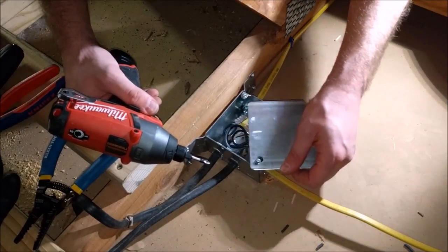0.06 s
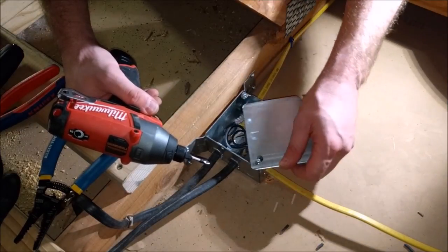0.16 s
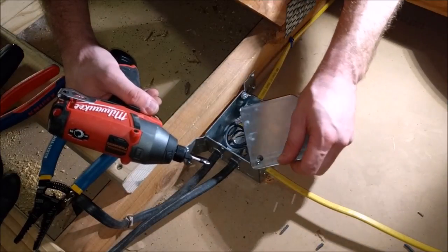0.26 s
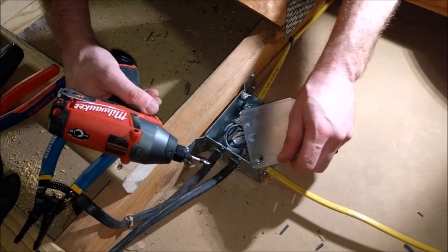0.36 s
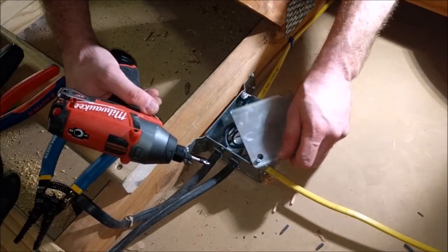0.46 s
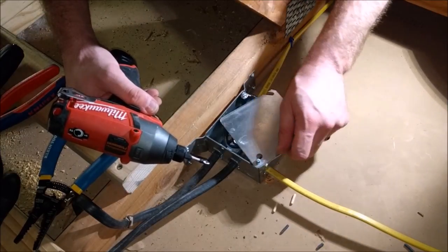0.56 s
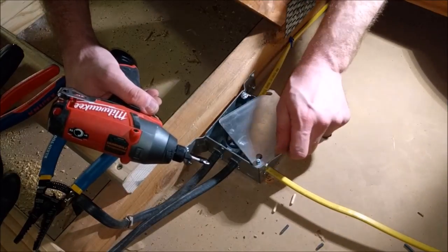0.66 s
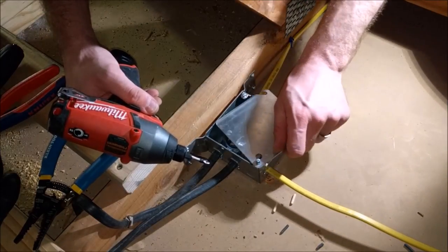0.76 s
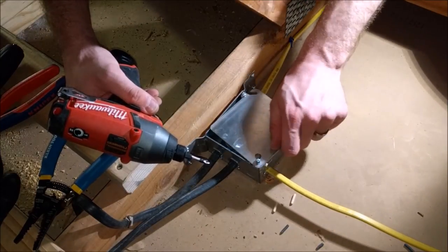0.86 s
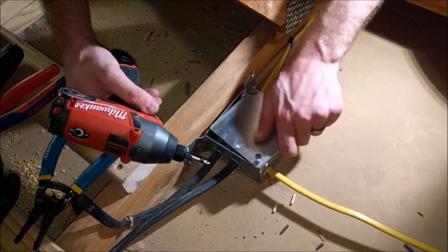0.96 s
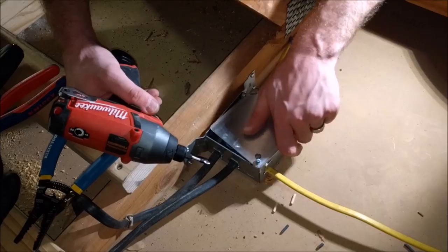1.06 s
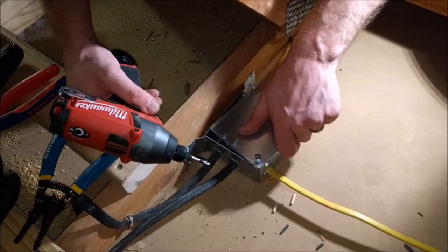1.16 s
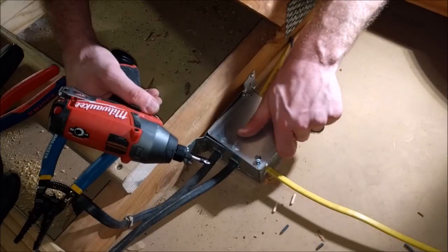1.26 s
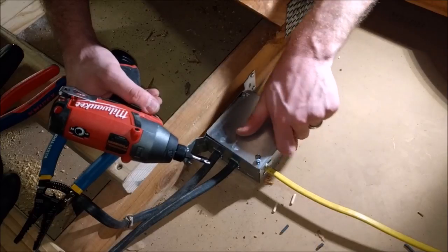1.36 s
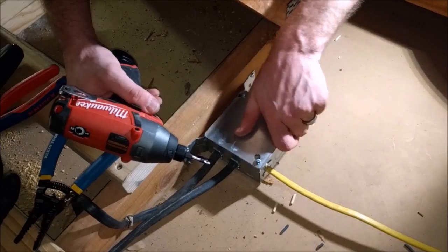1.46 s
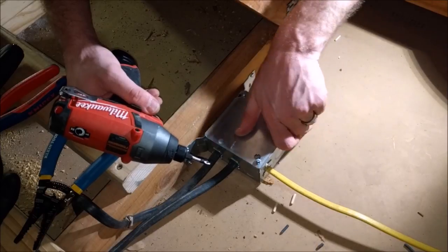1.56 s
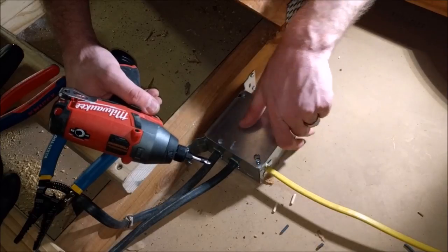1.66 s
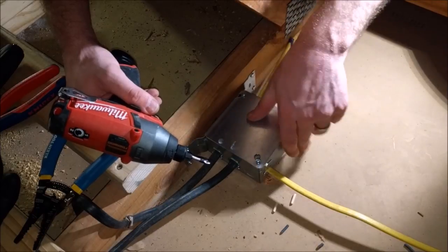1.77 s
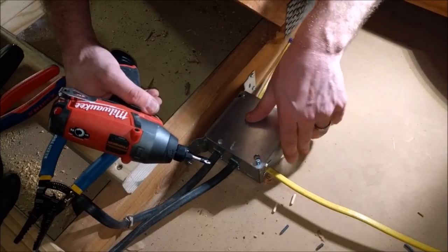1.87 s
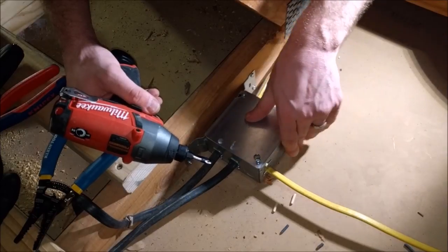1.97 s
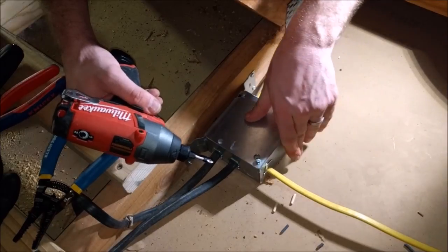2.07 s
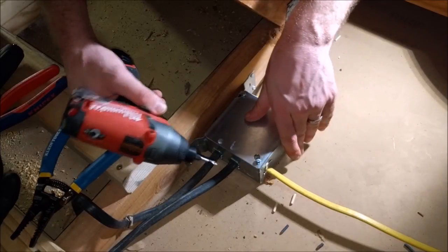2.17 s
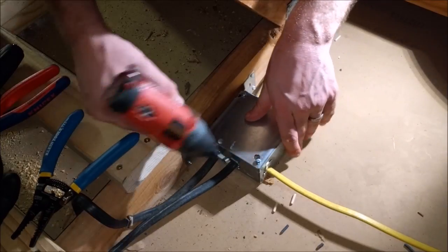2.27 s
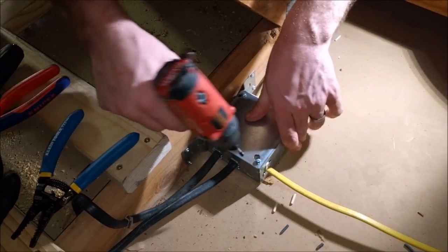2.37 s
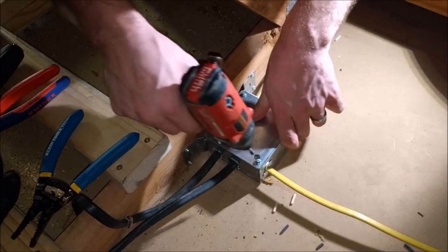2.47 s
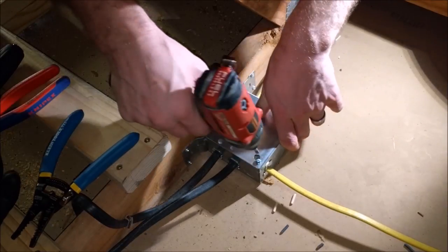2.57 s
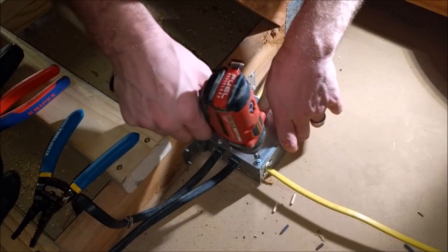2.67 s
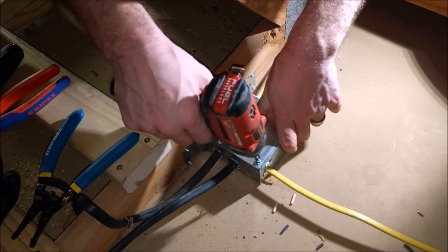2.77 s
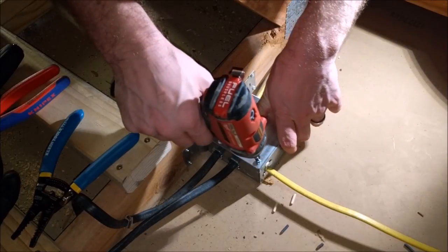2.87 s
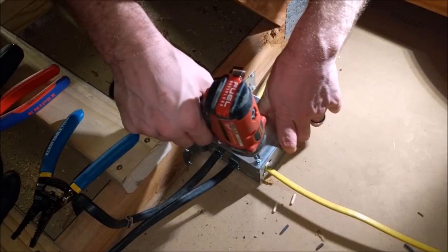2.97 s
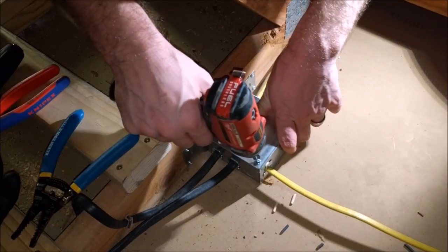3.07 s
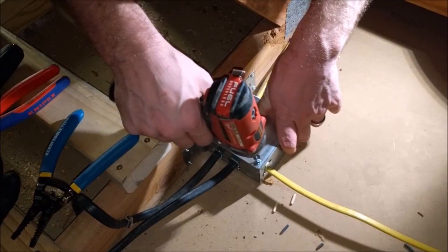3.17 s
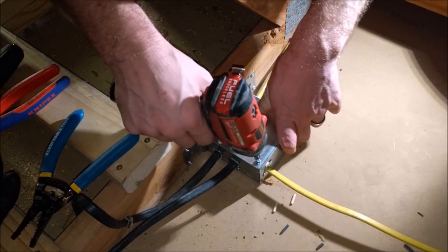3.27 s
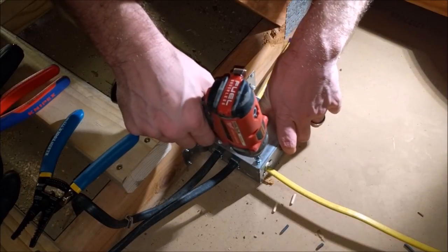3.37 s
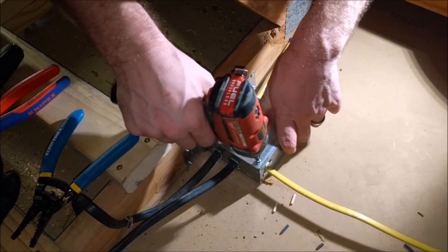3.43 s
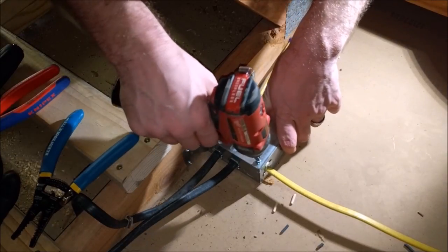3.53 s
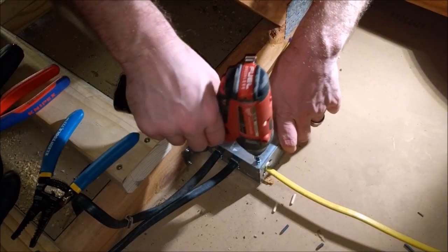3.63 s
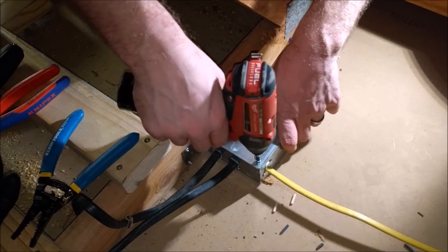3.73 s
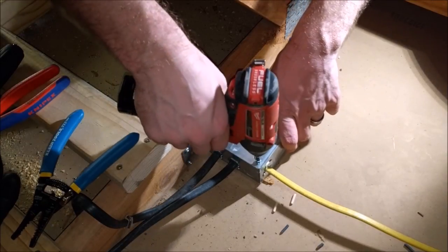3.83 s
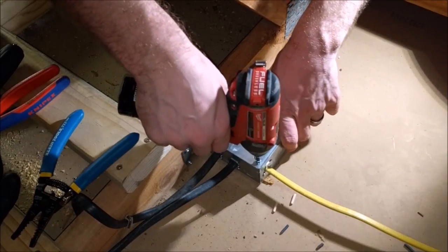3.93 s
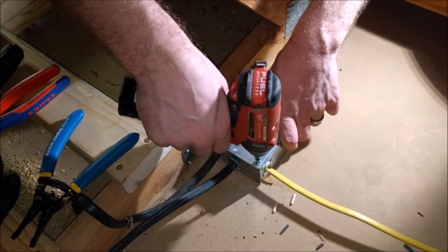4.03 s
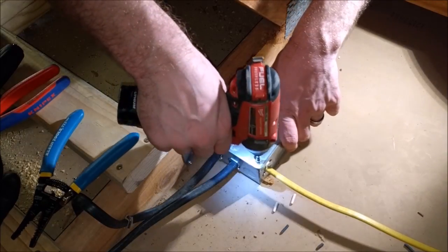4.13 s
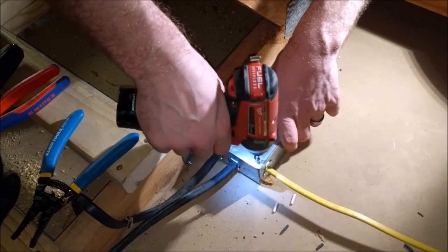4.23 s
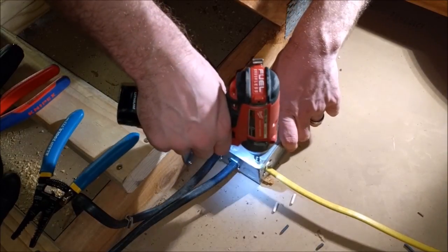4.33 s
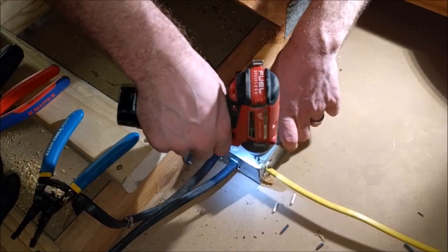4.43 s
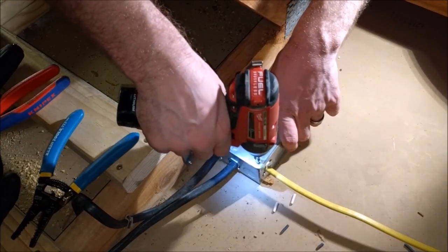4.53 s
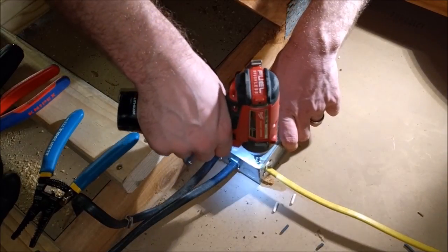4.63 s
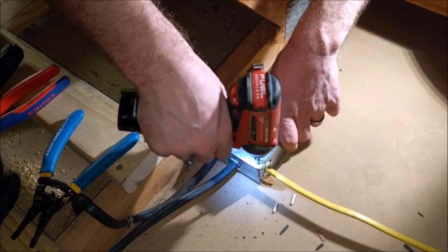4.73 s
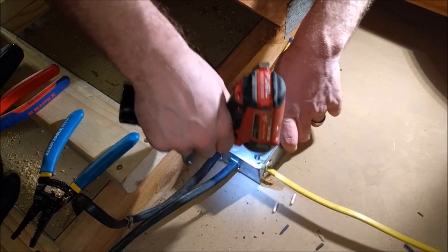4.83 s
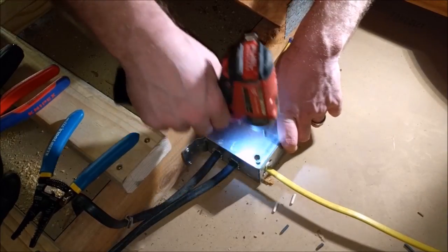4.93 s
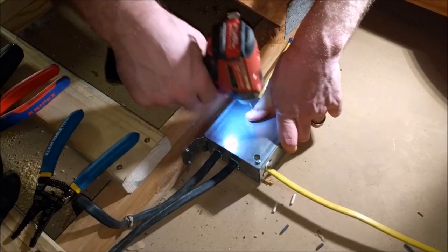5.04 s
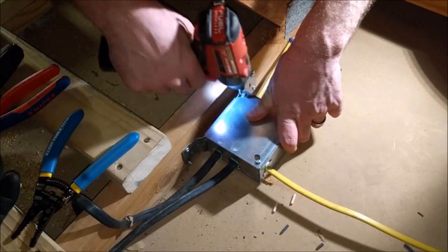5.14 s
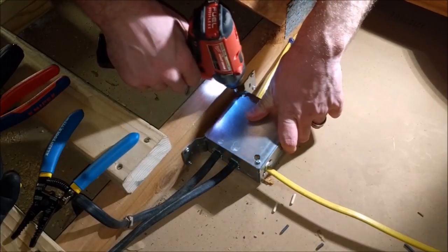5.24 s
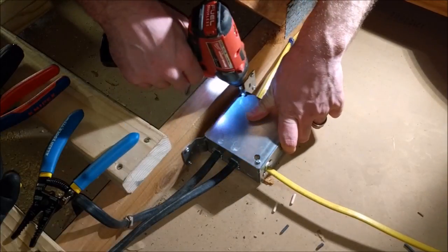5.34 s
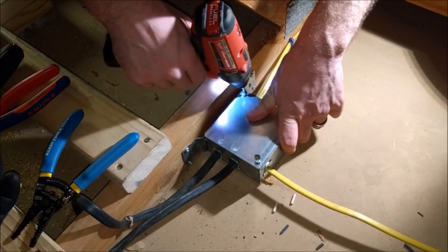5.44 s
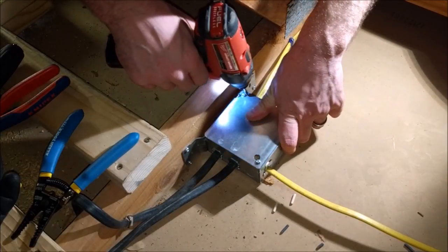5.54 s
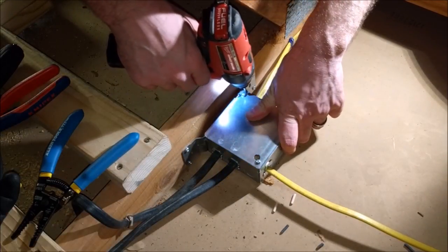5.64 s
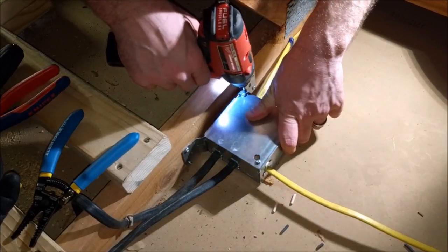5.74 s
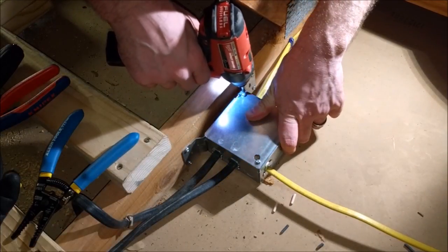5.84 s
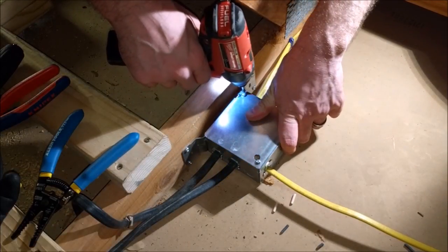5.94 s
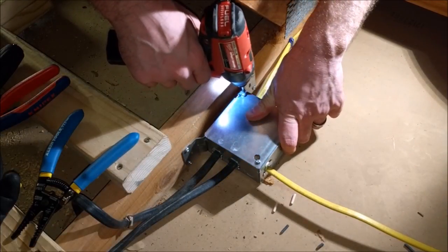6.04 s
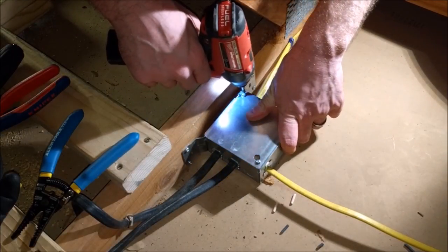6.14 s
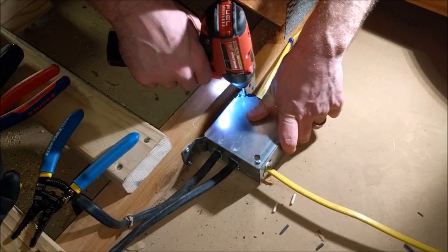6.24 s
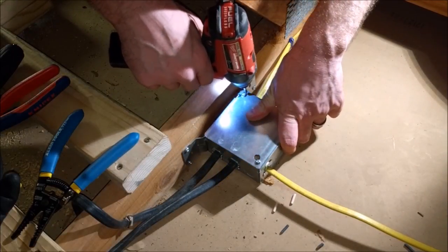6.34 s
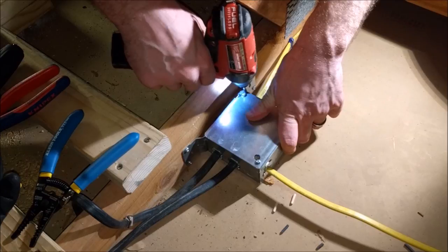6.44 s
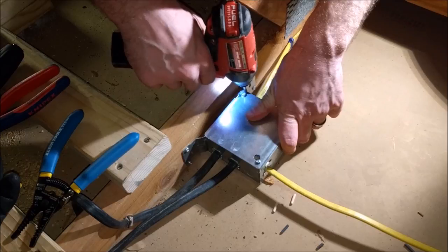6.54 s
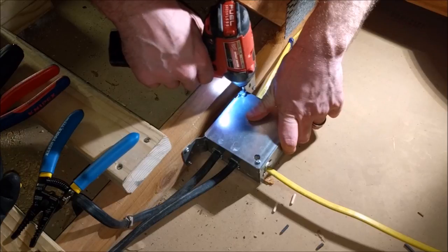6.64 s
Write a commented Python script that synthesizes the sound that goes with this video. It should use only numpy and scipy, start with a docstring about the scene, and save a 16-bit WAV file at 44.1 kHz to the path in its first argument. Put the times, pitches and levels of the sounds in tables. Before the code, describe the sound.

Close metal clacks and scrapes, one brief whirring, hammering run of an impact driver on a screw, then light ticks of the bit.

```python
"""A cordless impact driver runs a screw home: gears growl, the motor drive whistles, the bit hammers.
Before that, a steel cover is slid and clapped onto a junction box on an attic joist, and the driver is
picked up and set on the screw. Afterwards the bit feels for the next screw. Knocks ring the parts and
thump the boards; sliding edges stick, slip and rasp. All is heard close, in a short timber echo,
over faint air and rumble."""
import sys
import numpy as np
from scipy import signal
from scipy.fft import rfft, irfft
from scipy.io import wavfile

SR = 44100
rng = np.random.default_rng(int(sys.argv[2]) if len(sys.argv) > 2 else 0)


def log_audio(samples):
    """Write samples as a 16-bit WAV file to the path given in sys.argv[1]."""
    # one column per channel
    frames = np.atleast_2d(samples).T
    # limit to full scale, then quantise
    limited = np.clip(frames, -1, 1)
    pcm = np.round(limited * 32767).astype(np.int16)
    wavfile.write(sys.argv[1], SR, pcm)


N = 295470
T = np.arange(N) / SR


def undb(db):
    """Decibels to gain."""
    return 10 ** (np.asarray(db) / 20)


def unit_rms(x):
    """Scale to rms 1."""
    return x / np.sqrt(np.mean(x ** 2))


def decay(t, t60_s):
    """Exponential decay, 60 dB down at t60_s."""
    return np.exp(-np.log(1000) * t / t60_s)


def add(track, start_s, sound):
    """Mix a sound into a track."""
    i = max(int(start_s * SR), 0)
    track[i:i + len(sound)] += sound[:N - i]


def colour(x, spectrum):
    """Filter by an (f/Hz, level/dB) curve; rms 1."""
    hz, db = np.transpose(spectrum)
    bins_hz = np.maximum(np.fft.rfftfreq(len(x), 1 / SR), 1)
    gain = undb(np.interp(np.log(bins_hz), np.log(hz), db))
    return unit_rms(irfft(rfft(x) * gain, len(x)))


def wander(rate_hz):
    """Random drift, spread near 1."""
    knots = rng.standard_normal(4096)
    return np.interp(T * rate_hz, np.arange(len(knots)), knots)


# Gear mesh rate, varying with thread drag: t/s, f/Hz
MESH_RATE = [(4.3, 276.4), (4.362, 272), (4.414, 356.9), (4.5, 314.7), (4.562, 373), (4.606, 368.1),
             (4.688, 398), (4.74, 254.6)]
# Housing response: f/Hz, level/dB
HOUSING_SPECTRUM = [(100, -23.5), (320, -9), (480, -40.5), (690, -0.5), (830, -12), (1020, 5), (1180, 0),
                    (1400, -12), (1620, -4.5), (1960, 2.5), (2250, -13.5), (2780, 2.5), (3300, -1.5),
                    (3700, -11.5), (4800, -24)]
# Tooth hiss: f/Hz, level/dB
HISS_SPECTRUM = [(200, -31.5), (600, -19), (1000, -3.5), (1400, -3), (2300, -5), (2800, 2.5), (3400, -4.5),
                 (3800, -5.5), (4400, -4.5), (5200, -14), (6500, -3.5), (7400, -15.5), (9300, -7),
                 (11000, -13.5), (15500, -16)]
# Gearcase resonances: f/Hz, width/Hz, level/dB
GEARCASE_MODES = [(2780, 94, -8.5), (3277, 45, -1.5), (3373, 55, -1.5)]


def motor():
    """Planet gears mesh unevenly and ring their case; the drive's switching tone splits with speed."""
    trigger_s, release_s, spin_up_s, brake_s = 4.161, 4.882, 0.01, 0.04
    free_mesh_hz, mesh_per_turn, switching_hz = 365, 3, 9856
    spin_up = 1 - np.exp(-np.maximum(T - trigger_s, 0) / spin_up_s)
    brake = np.clip(1 - (T - release_s) / brake_s, 0, 1)
    drive = spin_up * brake
    mesh_hz = np.interp(T, *np.transpose(MESH_RATE)) * drive
    speed = mesh_hz / free_mesh_hz
    running = speed > 0
    shaft_rad = 2 * np.pi * np.cumsum(mesh_hz / mesh_per_turn) / SR
    mesh_rad = mesh_per_turn * shaft_rad + 0.12 * wander(45)

    # Uneven tooth load: each harmonic flutters in level and phase.
    growl = sum((1 + 0.51 * wander(70)) * np.sin(k * mesh_rad + 0.4 * wander(60)) for k in range(1, 15))
    growl *= 1 + 0.32 * np.sin(0.32 * shaft_rad)  # planet orbit throb
    growl = colour(growl * running, HOUSING_SPECTRUM) * np.sqrt(running.mean())
    teeth = rng.standard_normal(N) * (1 + 0.5 * np.sin(mesh_rad)) * undb(2.4 * wander(120))
    gears = undb(-3.5) * growl + undb(-5.5) * colour(teeth, HISS_SPECTRUM)
    case = unit_rms(sum(undb(db) * signal.lfilter(*signal.iirpeak(hz, hz / width_hz, fs=SR), teeth)
                        for hz, width_hz, db in GEARCASE_MODES))

    carrier_rad = 2 * np.pi * switching_hz * T
    sidebands = [(-4, -17), (-2, 0), (0, -8), (2, -2), (4, -18)]  # shaft order, level/dB
    whistle = sum(undb(db + 3 * wander(12)) * np.sin(carrier_rad + k * shaft_rad) for k, db in sidebands)
    return gears * speed * undb(-23.5) + (case * undb(-28.5) + whistle * undb(-36.5)) * drive


# Blows on the screw: t/s, level/dB, tilt/dB, thump/dB
HAMMER_BLOWS = [(4.185, -32.5, 6.5, -30.5), (4.227, -29.5, -5.5, -29), (4.262, -15, 1.5, -29.5),
                (4.278, -29, 9, -38.5), (4.734, -24.5, -3.5, -21), (4.752, -19, -1, -25),
                (4.763, -18, 0.5, -29), (4.78, -24.5, 4, -30.5), (4.809, -27.5, -2.5, -26.5),
                (4.845, -18.5, -2.5, -26.5), (4.872, -23.5, 6.5, -33)]
# Steel box and cover: f/Hz, level/dB, base t60/s
BOX_MODES = [(634.7, -6, 0.13), (768, -3.5, 0.066), (885, 1.5, 0.099), (972.5, 6, 0.056),
             (1033, 3.5, 0.056), (1185, -1.5, 0.066), (1400, -9.5, 0.059), (1550, -1, 0.096),
             (1930, 3.5, 0.039), (2017, -10, 0.31), (2214, -1.5, 0.14), (2430, -6.5, 0.1),
             (2820, -5.5, 0.12), (3204, -2, .05), (3630, 0, .05), (4222, 3.5, 0.039), (4470, 5.5, 0.033),
             (4850, -2, .05), (6500, -13.5, 0.021), (6370, -19, 0.12), (7900, 1, 0.069),
             (8670, -4.5, 0.094), (10700, -8, 0.052), (11200, -10.5, .05), (13700, -13.5, 0.057)]


def hammering():
    """The turning bit catches and hammers the screw, ringing the box."""
    return knocks(HAMMER_BLOWS, BOX_MODES, clang_db=-2, thump_t60_s=0.49, sway_db=-10.5, sway_s=0.084,
                  crack_db=15, crack_t60_s=0.071, damping=1, detune=0.015, cutoff_hz=13600)


# Cover claps: t/s, level/dB, tilt/dB, thump/dB
COVER_KNOCKS = [(0.002, -48, 0, -38.5), (0.104, -52, 1.5, -45.5), (0.227, -50.5, -8.5, -47),
                (0.371, -58.5, -4.5, -44.5), (0.55, -22.5, 0.5, -36.5), (0.59, -42, -4, -31),
                (0.661, -22.5, 1, -34.5), (0.775, -40.5, -6, -39), (0.86, -42.5, -15, -29),
                (0.953, -36, 3, -45), (0.973, -25.5, -7.5, -24), (1.285, -40, -7.5, -36),
                (1.31, -46, -12, -31), (1.344, -39, 4.5, -35.5), (1.353, -36, -5.5, -33.5),
                (1.491, -35.5, -7.5, -25.5), (1.677, -55, -10, -47.5), (1.731, -38.5, -6, -36.5),
                (1.797, -55.5, -19.5, -39), (1.828, -39, -6, -47), (1.854, -31, -10.5, -35),
                (1.874, -26, 5.5, -32), (1.915, -30, -1.5, -31.5)]
# Cover scrapes: t/s, length/s, level/dB
COVER_SLIDES = [(0.0, 0.026, -46), (.508, 0.051, -48.5), (.58, 0.036, -27.5), (.622, 0.018, -23),
                (.68, 0.099, -42.5), (.81, 0.091, -40.5), (.925, 0.047, -33.5), (1.295, 0.037, -31.5),
                (1.455, 0.032, -44), (1.785, 0.23, -43.5), (1.858, 0.03, -28)]


def cover():
    """The steel cover claps and scrapes on the box."""
    claps = knocks(COVER_KNOCKS, BOX_MODES, clang_db=-0.5, thump_t60_s=0.27, sway_db=-18, sway_s=0.046,
                   crack_db=10.5, crack_t60_s=0.071, damping=1.84, detune=0.011, cutoff_hz=12100)
    return claps + slides(COVER_SLIDES, BOX_MODES, grit_db=15.5, slips_per_s=1700, cutoff_hz=9500)


# Driver rocking on the boards: t/s, level/dB, tilt/dB, thump/dB
LIFT_KNOCKS = [(2.299, -43.5, -8.5, -38.5), (2.329, -46.5, -5.5, -37.5), (2.35, -51.5, -12, -46.5),
               (2.385, -58, -7, -39)]
# Bit entering the screw head: t/s, level/dB, tilt/dB, thump/dB
SEAT_KNOCKS = [(2.968, -44.5, -3.5, -51), (3.097, -48, 2, -31), (3.15, -53, -11.5, -31),
               (3.429, -35, -1, -27), (3.533, -38, 4, -27.5), (3.585, -70, -12, -46),
               (3.762, -62.5, 5.5, -48)]
# Driver scrapes: t/s, length/s, level/dB
DRIVER_SLIDES = [(2.24, 0.058, -55.5), (2.305, 0.025, -48), (2.332, 0.062, -45), (2.38, 0.02, -48),
                 (3.015, 0.027, -46.5), (3.06, 0.077, -50)]
# Driver body: f/Hz, level/dB, base t60/s
DRIVER_MODES = [(654, -19, 1), (768, 5.5, 0.054), (902, 3, 0.058), (1096, -11, 0.082), (1264, -9, 0.12),
                (1716, -17, 0.19), (1937, -11, 0.085), (2500, 14, 0.031), (2920, 1, 0.16),
                (3094, 14.5, 0.023), (3870, 16, 0.022), (4470, 5, 0.028), (7100, -2, 0.15),
                (8200, -6, 0.085), (9700, -4, 0.17), (12500, -7, .09)]
# Bit in its chuck: f/Hz, level/dB, base t60/s
CHUCK_MODES = [(636, -7.5, 0.21), (986, -1, 0.1), (1124, -0.5, 0.08), (1260, -2.5, 0.16), (1790, 4, 0.18),
               (1940, 2.5, 0.1), (2440, -0.5, 0.1), (2830, 7, 0.1), (3080, 0.5, 0.089), (4240, 10.5, 0.061),
               (7540, -6, 0.083), (9940, -4, 0.14), (12500, 2, 0.078)]


def driver_handling():
    """The driver rocks and scrapes as it is picked up; seating the bit rings the chuck."""
    lift = knocks(LIFT_KNOCKS, DRIVER_MODES, clang_db=15.5, thump_t60_s=0.15, sway_db=2.5, sway_s=0.027,
                  crack_db=21.5, crack_t60_s=0.074, damping=0.72, detune=0.0075, cutoff_hz=9000)
    seat = knocks(SEAT_KNOCKS, CHUCK_MODES, clang_db=4, thump_t60_s=0.19, sway_db=-10.5, sway_s=0.055,
                  crack_db=16.5, crack_t60_s=0.049, damping=1.63, detune=0.005, cutoff_hz=13400)
    scrapes = slides(DRIVER_SLIDES, DRIVER_MODES, grit_db=30, slips_per_s=3600, cutoff_hz=3720)
    return lift + seat + scrapes


# Taps at the next screw: t/s, level/dB, tilt/dB, thump/dB
BIT_TAPS = [(5.418, -48.5, -1, -38.5), (5.497, -47, -3, -54), (5.598, -48.5, -9, -40.5),
            (5.699, -62.5, -7.5, -48.5), (5.911, -43, 2, -37.5), (6, -55.5, 1.5, -38.5),
            (6.275, -52, -3.5, -45.5), (6.386, -53, -10, -56.5), (6.524, -49.5, -9, -42),
            (6.575, -60, -2.5, -65)]
# Bit scrapes: t/s, length/s, level/dB
BIT_SLIDES = [(5.425, 0.11, -45.5), (5.47, .05, -45.5), (5.592, 0.021, -48), (5.895, 0.016, -44),
              (6.21, 0.052, -55.5), (6.258, 0.0416, -43), (6.51, 0.02, -39), (6.6, 0.05, -57)]
# Bit on screw: f/Hz, level/dB, base t60/s
SCREW_MODES = [(1006, 4.5, 0.08), (1063, -3, 0.033), (1250, -4, 0.054), (1780, -2.5, 0.066),
               (2203, -5.5, 0.068), (2430, 0, 0.04), (3090, 1.5, 0.023), (3460, 12, 0.019),
               (4040, -13, .04), (5100, -30, 0.04), (6670, 1.5, 0.049), (6900, 1, 0.021),
               (7640, 5.5, 0.034), (9070, -1, 0.048), (9400, -4, 0.054), (11500, -19, .05)]


def bit_search():
    """The stopped bit taps and scrapes at the next screw."""
    taps = knocks(BIT_TAPS, SCREW_MODES, clang_db=3.3, thump_t60_s=0.2, sway_db=-6, sway_s=0.041,
                  crack_db=7, crack_t60_s=0.059, damping=0.99, detune=0.014, cutoff_hz=12700)
    return taps + slides(BIT_SLIDES, SCREW_MODES, grit_db=8, slips_per_s=1700, cutoff_hz=5200)


def ring(modes, crack_db, crack_t60_s, damping, detune, cutoff_hz):
    """One contact: modes detuned by the grip, over a crack of countless short-lived ones."""
    t = np.arange(SR // 2) / SR
    hz, db, t60_s = np.transpose(modes)[:, :, None]
    strike, grip, phase = rng.standard_normal((len(modes), 3)).T[:, :, None]
    gain = undb(db + 5 * np.clip(strike, -2, 1.2))  # strike point weights the modes
    detuned_hz = hz * (1 + detune * grip)
    tones = gain * decay(t, t60_s / damping) * np.sin(2 * np.pi * (detuned_hz * t + phase))
    crack = undb(crack_db) * decay(t, crack_t60_s) * rng.standard_normal(len(t))
    attack = 1 - np.exp(-t / 0.0011)
    softness = signal.butter(2, cutoff_hz, fs=SR, output="sos")
    return signal.sosfilt(softness, (tones.sum(axis=0) + crack) * attack)


# Body, clang and tick bands: low/Hz, high/Hz
KNOCK_BANDS = [(500, 1350), (1750, 5000), (5000, 17000)]
# Board thump: f/Hz, level/dB
BOARD_SPECTRUM = [(35, -25.5), (60, -13.5), (81, -10.5), (120, -3.5), (165, -8.5), (220, -0.5), (258, 4.5),
                  (285, 0), (313, 4.5), (345, -4.5), (385, -12), (448, 6), (530, -21), (660, -4.5),
                  (1100, -24.5), (2000, -43.5)]


def knocks(events, modes, clang_db, thump_t60_s, sway_db, sway_s, **contact):
    """Each knock rings the part and thumps the boards; the joists swing widest sway_s later."""
    out, t = np.zeros(N), np.arange(SR) / SR
    onset_samples = SR // 40
    bands = [signal.butter(3, edges_hz, "band", fs=SR, output="sos") for edges_hz in KNOCK_BANDS]
    thump_envelope = (1 - np.exp(-t / 0.0049)) * decay(t, thump_t60_s)
    sway_envelope = t / sway_s * np.exp(1 - t / sway_s)
    for start_s, level_db, tilt_db, thump_db in events:
        ringing = ring(modes, **contact)
        for band, band_db in zip(bands, (-tilt_db, clang_db, tilt_db)):
            part = signal.sosfilt(band, ringing)
            add(out, start_s, part / np.std(part[:onset_samples]) * undb(level_db + band_db))
        thump = colour(rng.standard_normal(len(t)), BOARD_SPECTRUM) * thump_envelope
        sway = colour(rng.standard_normal(len(t)), RUMBLE_SPECTRUM) * sway_envelope
        add(out, start_s, (thump + undb(sway_db) * sway) * undb(thump_db))
    return out


def slides(events, modes, grit_db, slips_per_s, cutoff_hz):
    """Stick-slip: dense, uneven contacts ring modes damped by the pressing edge into a rasp."""
    out = np.zeros(N)
    highpass = signal.butter(2, 550, "high", fs=SR, output="sos")
    for start_s, length_s, level_db in events:
        n = int(length_s * SR)
        chance, force = rng.random(SR // 4)[:n], rng.standard_normal(SR // 4)[:n]
        slips = (chance < slips_per_s / SR) * force * signal.windows.tukey(n, 0.5)
        response = ring(modes, grit_db, crack_t60_s=0.012, damping=2.8, detune=0.02, cutoff_hz=cutoff_hz)
        rasp = signal.sosfilt(highpass, signal.fftconvolve(slips, response))
        rms = np.sqrt(np.sum(rasp ** 2) / n + 1e-12)
        add(out, start_s, rasp / rms * undb(level_db))
    return out


# Echo in the bass and the three knock bands: level/dB, t60/s
ECHO_DECAYS = [(6, 0.26), (3, 0.32), (1.5, 0.24), (-1, .19)]


def attic(dry, wet_db):
    """Close timber reflects the sound at once; the treble dies first."""
    t = np.arange(SR // 2) / SR
    tail = np.zeros(len(t))
    for edges_hz, (db, t60_s) in zip([(80, 663)] + KNOCK_BANDS, ECHO_DECAYS):
        band = signal.butter(2, edges_hz, "band", fs=SR, output="sos")
        tail += signal.sosfilt(band, rng.standard_normal(len(t))) * undb(db) * decay(t, t60_s)
    tail *= 1 - np.exp(-t / 0.00072)
    return dry + undb(wet_db) * signal.fftconvolve(dry, tail / np.linalg.norm(tail))[:N]


# Still air: f/Hz, level/dB
AIR_SPECTRUM = [(25, -2), (60, 20), (150, 9.5), (280, 2), (400, -6), (690, -8.5), (1000, -9.5), (1600, -14),
                (4000, -17.5), (8000, -17.5), (12000, -16), (16000, -17)]
# Room rumble and joist sway: f/Hz, level/dB
RUMBLE_SPECTRUM = [(20, -39.5), (40, -16), (62, 2), (90, 2), (125, -15), (170, -11), (260, -10), (400, -29),
                   (1000, -79)]


def background():
    """Faint air over a low, wavering rumble."""
    air = colour(rng.standard_normal(N), AIR_SPECTRUM) * undb(-51.5 + wander(1.1))
    rumble = colour(rng.standard_normal(N), RUMBLE_SPECTRUM) * undb(-63 + 1.2 * wander(5.5))
    return air + rumble


def scene():
    """Driver and cover in the attic, mono."""
    work = cover() + driver_handling() + hammering() + bit_search() + motor()
    return (attic(work, wet_db=-10) + background())[None]


def record(dry):
    """Soft clip, then a steep low-pass."""
    cutoff_hz = 15800
    rounded = 1.188 * np.tanh(dry / 1.05)
    return signal.sosfilt(signal.ellip(8, 0.2, 70, cutoff_hz, fs=SR, output="sos"), rounded)


dry = scene()
out = record(dry)
log_audio(out)
```